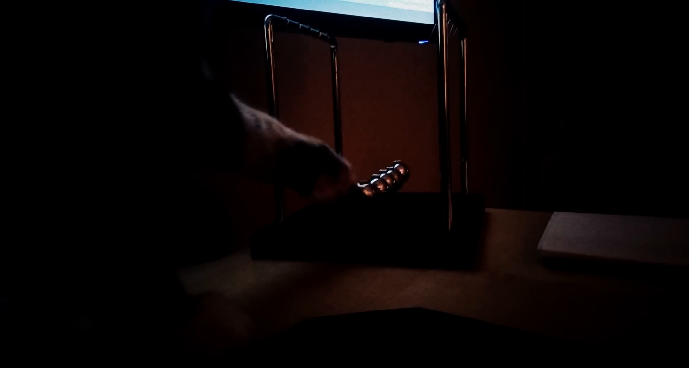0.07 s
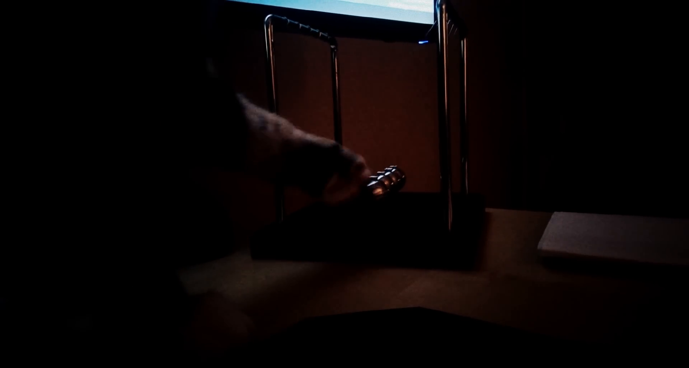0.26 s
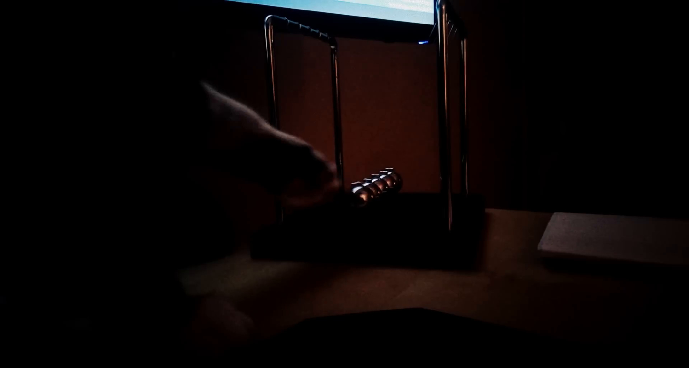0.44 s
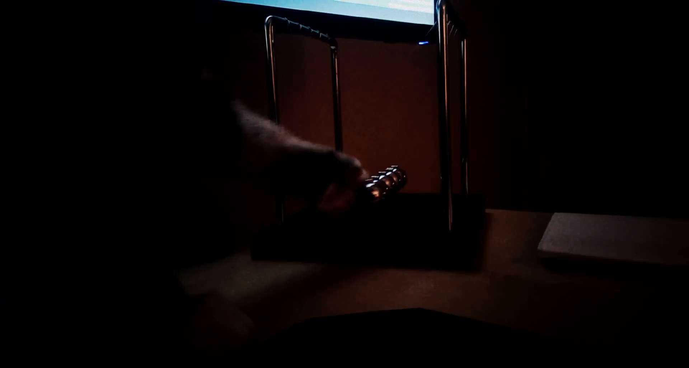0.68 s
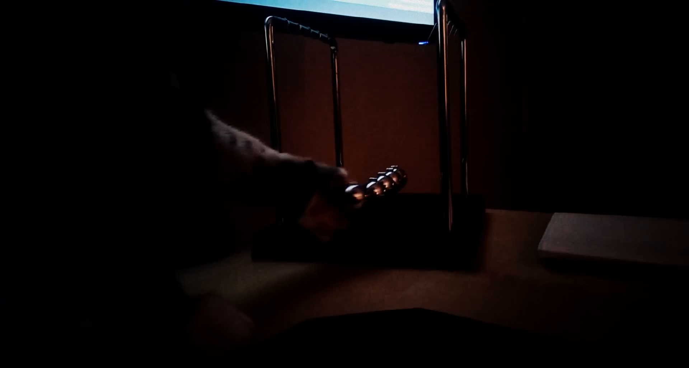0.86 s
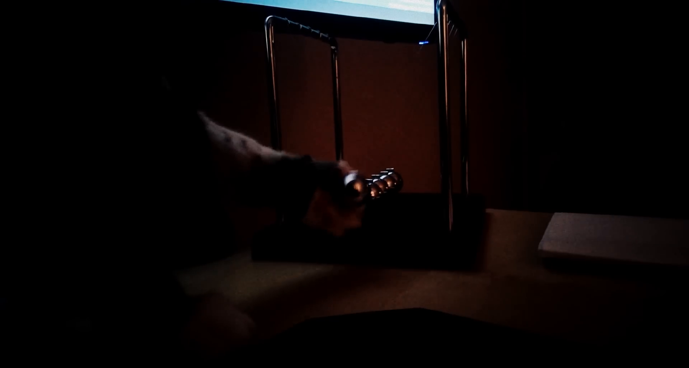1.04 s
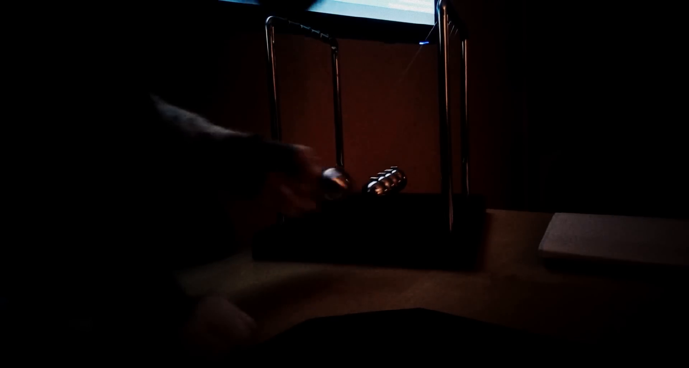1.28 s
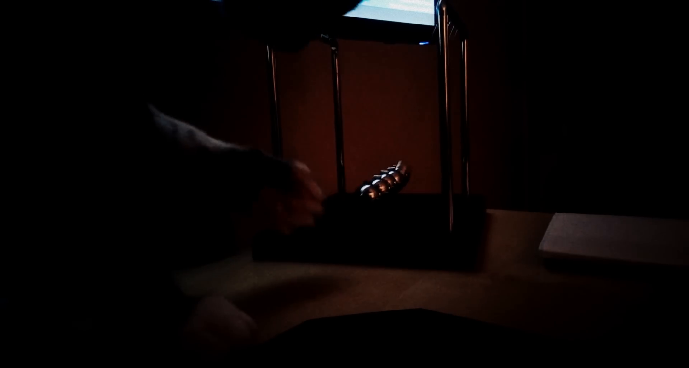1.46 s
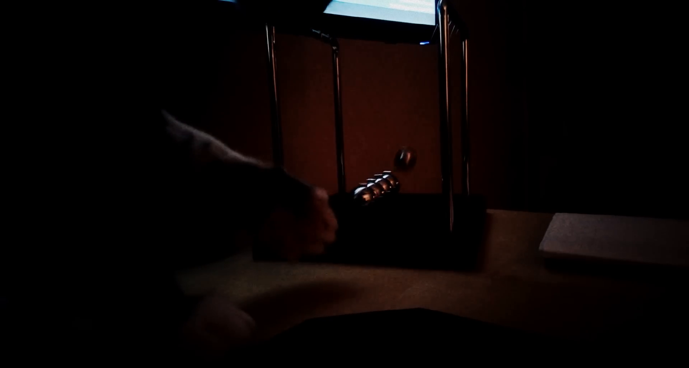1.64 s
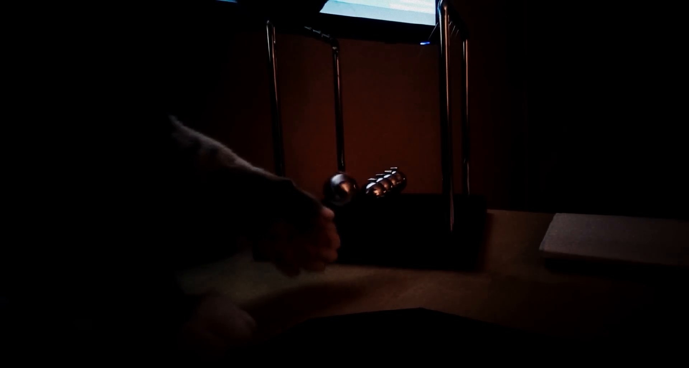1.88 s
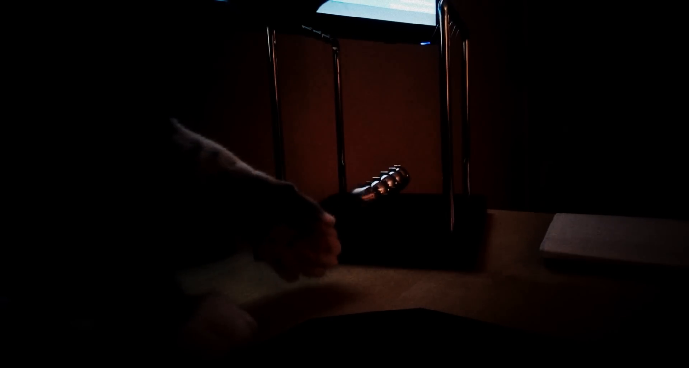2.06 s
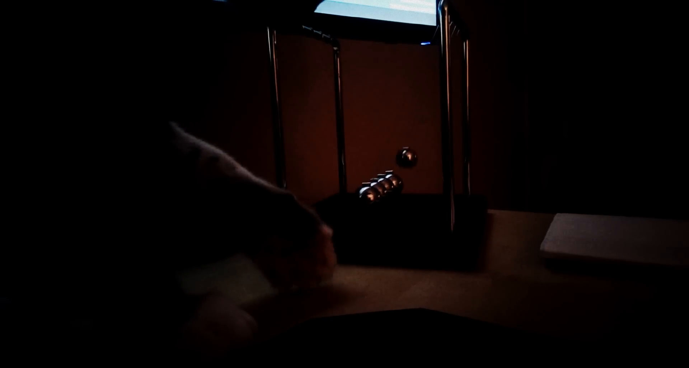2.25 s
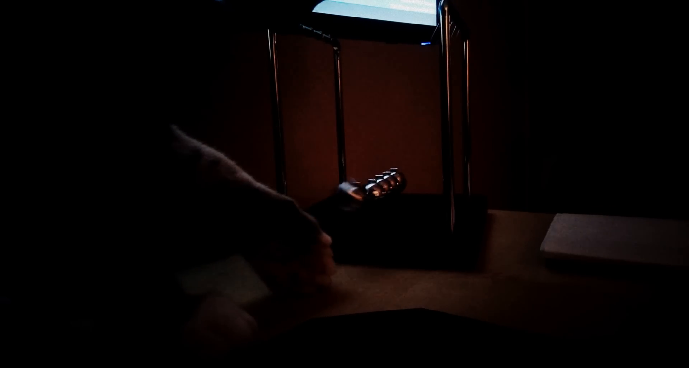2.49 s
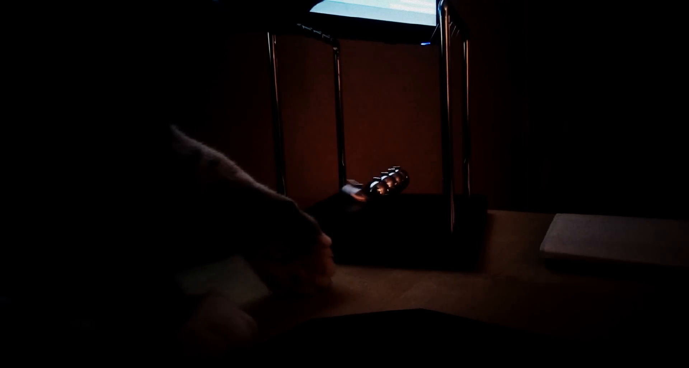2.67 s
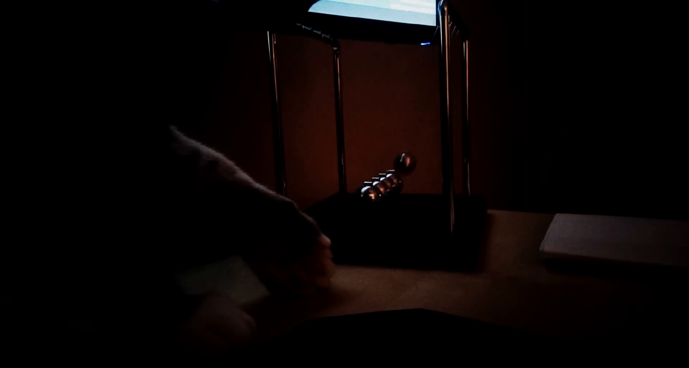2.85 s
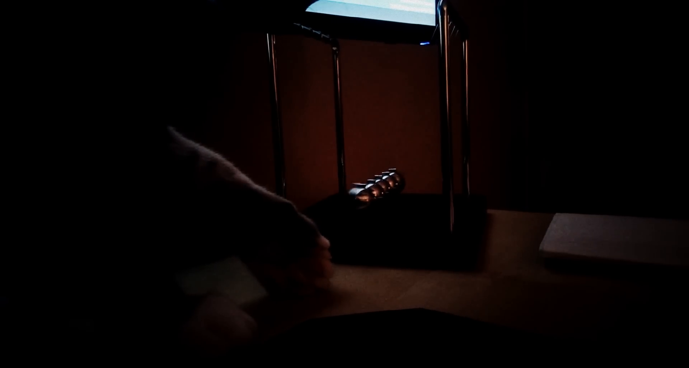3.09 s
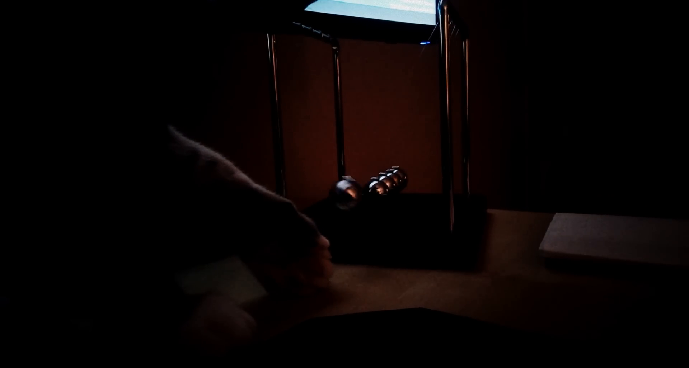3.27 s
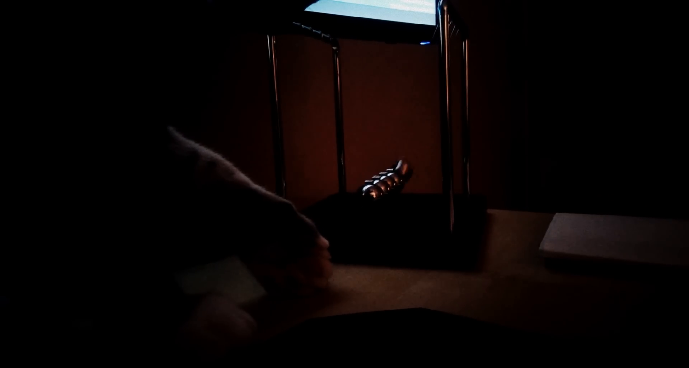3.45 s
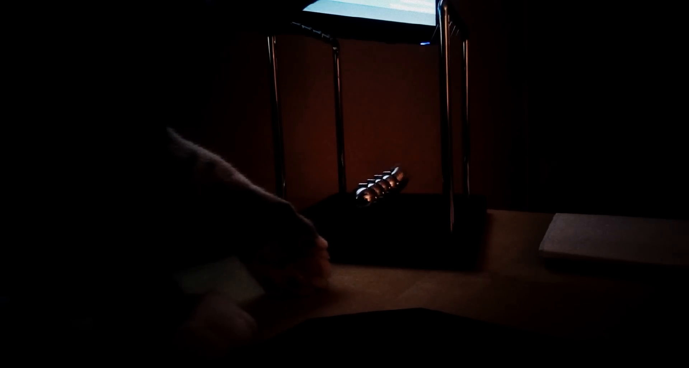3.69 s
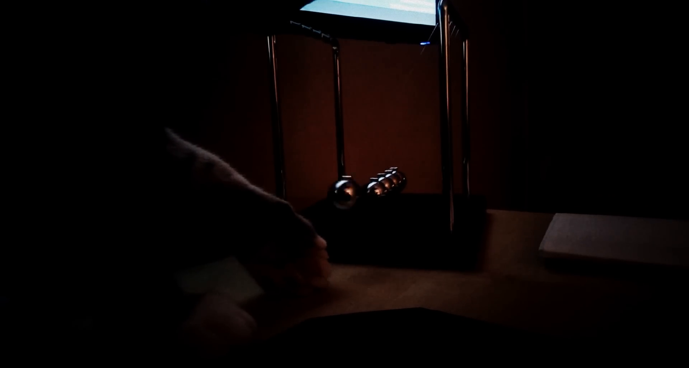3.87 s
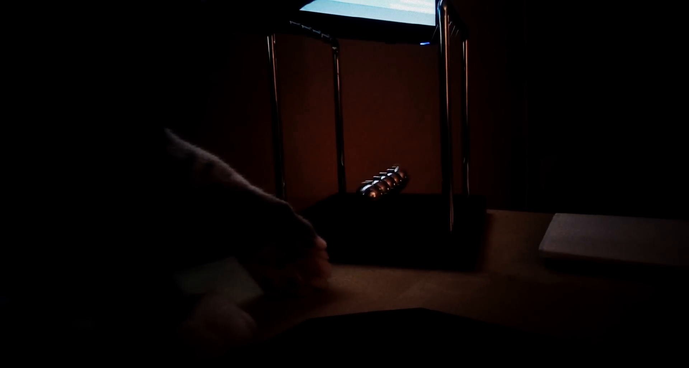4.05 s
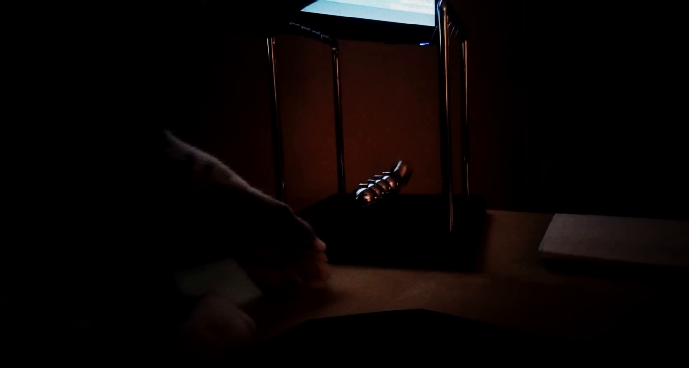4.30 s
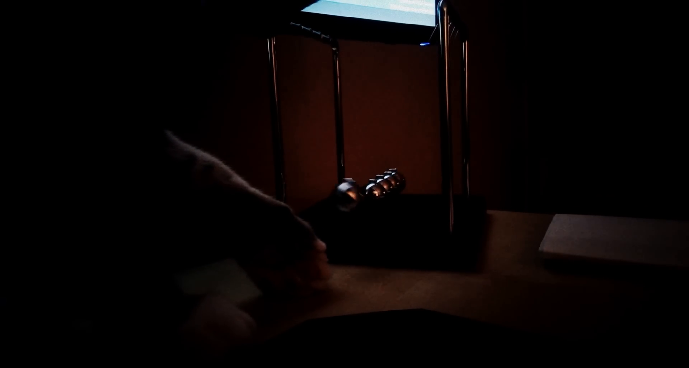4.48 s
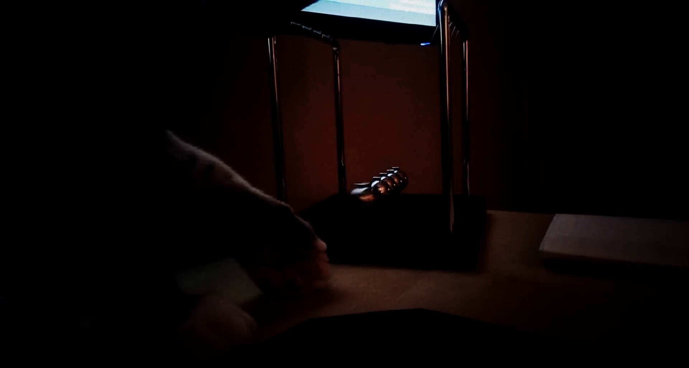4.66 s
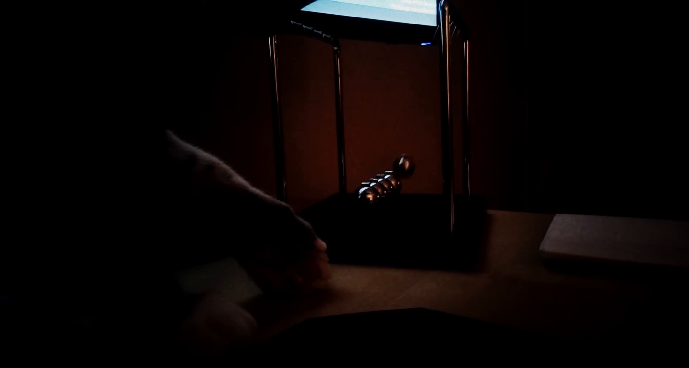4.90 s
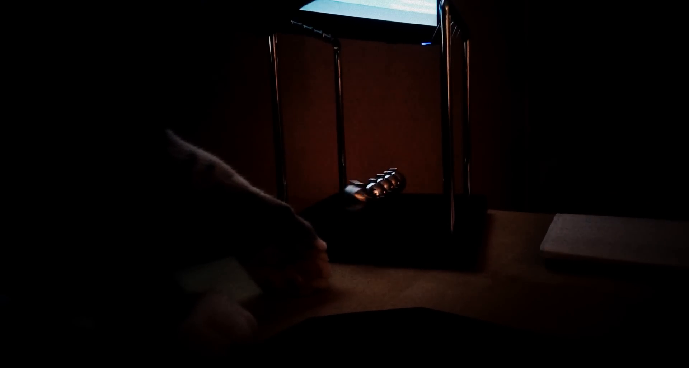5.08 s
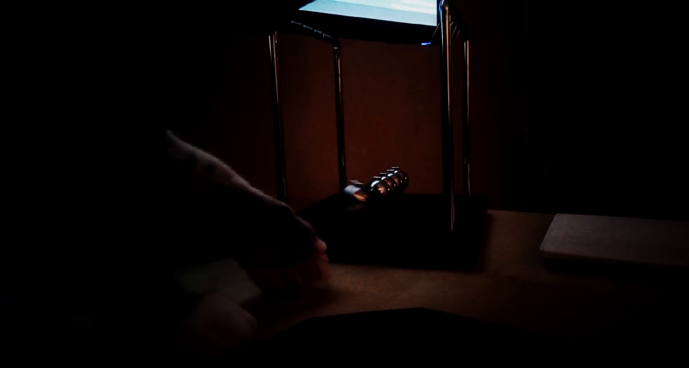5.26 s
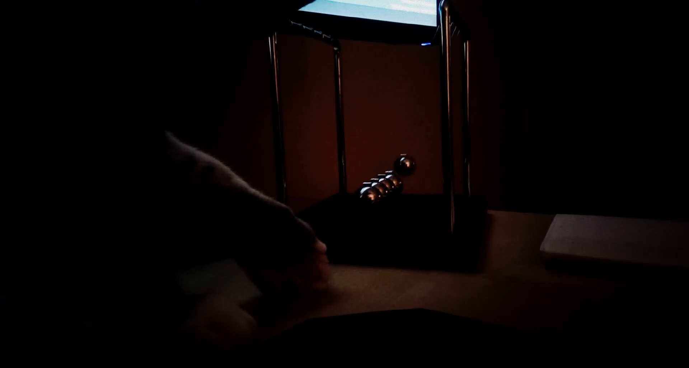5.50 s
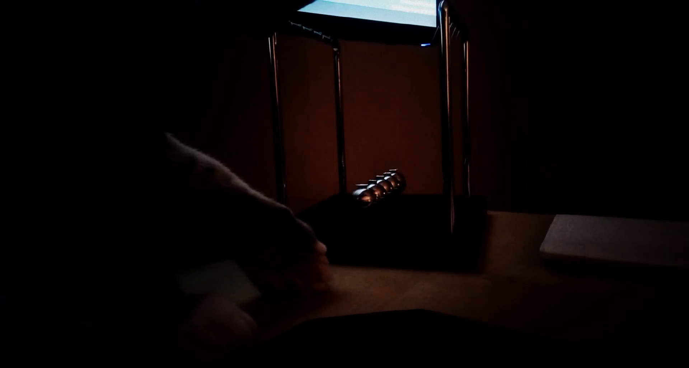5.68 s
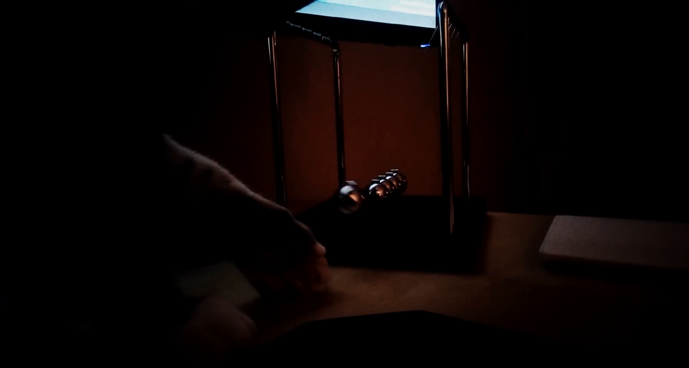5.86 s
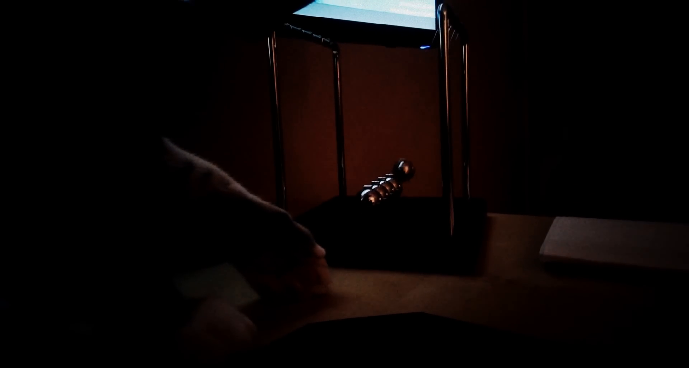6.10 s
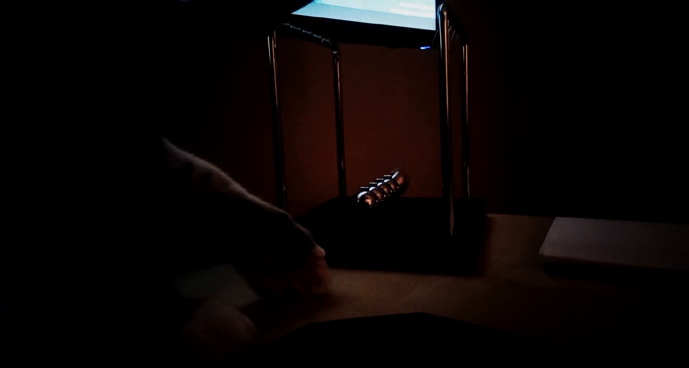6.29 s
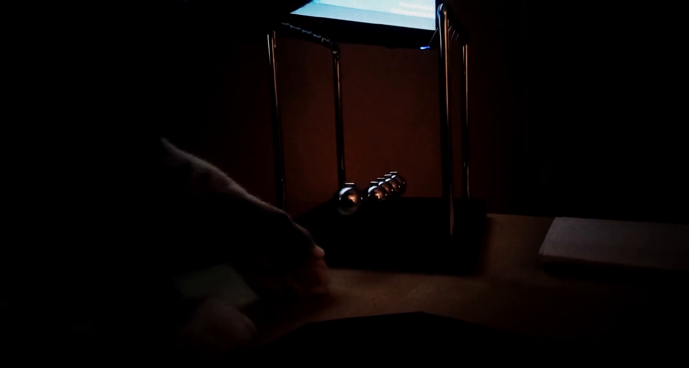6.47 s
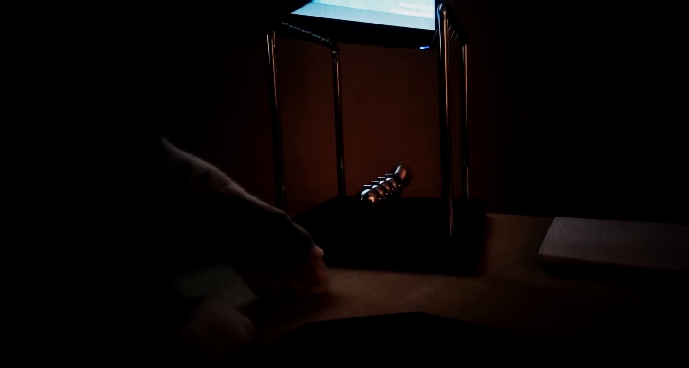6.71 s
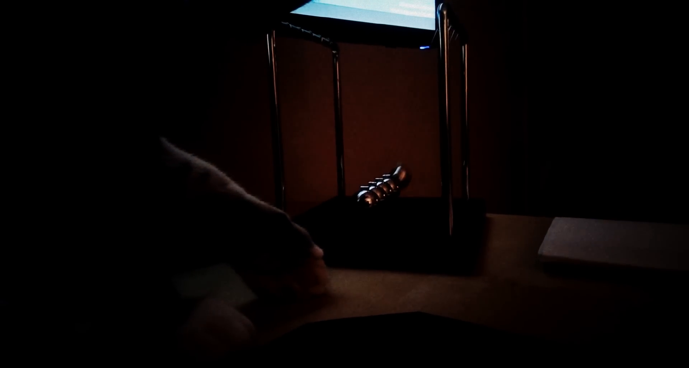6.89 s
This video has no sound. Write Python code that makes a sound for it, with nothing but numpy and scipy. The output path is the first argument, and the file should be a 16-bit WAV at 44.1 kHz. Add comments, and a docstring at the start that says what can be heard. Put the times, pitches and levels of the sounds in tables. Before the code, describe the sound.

A desktop pendulum toy with steel balls is heard close up in a quiet room, over soft room tone and a faint fan hum. For the first 1.5 seconds the balls tick lightly and unevenly as one is drawn back. Two faint, thin squeaks fall in pitch within the first 0.3 seconds, followed by a brief rub and a couple of soft bumps. From about 1.6 seconds the balls clack loudly and evenly, three times a second, each bright clack a quick chatter of contacts with a short room echo and a faint desk thud. A very soft brush on the desk comes near 1.9 seconds. Small jostling ticks fall between the clacks, weakening until they vanish around 6 seconds. The clacks grow tighter and slightly softer, continuing to the end at about 7 seconds.

```python
"""A Newton's cradle on a desk in a quiet room, close to a pair of microphone ports.
The steel balls tick lightly as a paw draws one back; once let go it clacks three times a second, each
clack a quick chatter of separate contacts, with small jostles in between. The frame rocks and the desk
thuds faintly. The paw brushes past, two thin squeaks fall near the start, and a fan hums behind it all."""
import sys
import numpy as np
from scipy import signal
from scipy.fft import rfft, irfft
from scipy.io import wavfile
from scipy.ndimage import uniform_filter1d

SR = 44100
rng = np.random.default_rng(int(sys.argv[2]) if len(sys.argv) > 2 else 0)


def transcribe(signal):
    """Save signal, clipped to [-1, 1], as a 16-bit WAV file at the path in sys.argv[1]."""
    frames = np.atleast_2d(signal).T
    limited = np.clip(frames, -1, 1)
    pcm = np.round(limited * 32767).astype(np.int16)
    wavfile.write(sys.argv[1], SR, pcm)


N = 305613

# One clack a swing. Each row: start in seconds, first blow's strength in dB, its chatter in seconds,
# second blow's delay in seconds, its strength in dB, its chatter in seconds, share of the chatter at
# which a middle contact falls (0 for none), desk thud in dB, desk knock in dB.
SWINGS = [(1.56172, 2, 0, .01066, -.5, .00685, .64, -64, -76),
          (1.88844, 2.5, 0, .01208, .7, .004, .73, -55, -57),
          (2.21494, 3.5, 0, .01456, 1.2, .00177, .86, -56, -72),
          (2.54147, 1.5, 0, .01465, -1.8, .00091, .37, -52.5, -55),
          (2.86932, .5, 0, .01261, -4, .00251, .08, -55, -76),
          (3.1959, 1, 0, .01104, .6, .00091, .4, -55, -56),
          (3.52349, 1.5, 0, .00882, -.3, .0008, .57, -68, -76),
          (3.84995, -1.5, 0, .00667, -1.7, .00034, 0, -60, -51),
          (4.17794, -2.5, 0, .00297, -2.7, .00115, .37, -63, -72),
          (4.50463, -2.5, 0, .00034, -.7, 0, 0, -59, -74),
          (4.8288, -1.7, .00097, .00349, -2, 0, .7, -60, -57),
          (5.15277, 3, 0, .00492, -2.5, 0, 0, -52, -64),
          (5.4768, -.7, .00014, .00715, 1.5, 0, 0, -53.5, -69),
          (5.79955, -3.2, .00174, .00734, -2.5, 0, .31, -60, -58),
          (6.12401, -2.2, .00071, .00701, -2.5, 0, 0, -72, -74),
          (6.4481, 1, 0, .00401, -5.5, 0, 0, -65, -53),
          (6.77204, -2.7, 0, .00077, -2.7, .00125, .51, -68, -70)]


def gain_of(db):
    """Decibels to amplitude."""
    return 10 ** (np.asarray(db) / 20)


def unit_rms(x):
    """Scales to rms 1."""
    return x / np.sqrt(np.mean(x ** 2) + 1e-20)


def curves_at(table, hz):
    """A table's columns at the frequencies hz, interpolated on a log axis."""
    table_hz, *columns = np.transpose(table)
    return np.array([np.interp(np.log(hz + 1), np.log(table_hz + 1), column) for column in columns])


def add(mix, start_s, sound):
    """Mixes a sound in at start_s."""
    part = mix[max(round(start_s * SR), 0):][:len(sound)]
    part += sound[:len(part)]


def causal_pulse(db):
    """The shortest causal pulse that has the spectrum db."""
    log_gain = np.concatenate([db, db[-2:0:-1]]) * np.log(10) / 20
    return np.fft.ifft(np.exp(np.conj(signal.hilbert(log_gain)))).real


def ring(x, responses):
    """Passes one signal through a response for each channel."""
    return signal.oaconvolve(x[None], np.atleast_2d(responses), axes=1)[:, :N]


def drift(top_hz):
    """A random wander of rms 1, made of sines below top_hz."""
    t = np.arange(0, N, 256) / SR
    rates_hz = top_hz * rng.uniform(0.101, 1, size=16)
    wander = sum(np.sin(2 * np.pi * (hz * t + rng.random())) for hz in rates_hz)
    return unit_rms(np.interp(np.arange(N) / SR, t, wander))


def room_air(level_db=-61.4, lean_db=1.25):
    """Steady room tone, nearly mono in the bass, leaning a little left."""
    # Each row: frequency in Hz, relative noise density in dB.
    spectrum = [(20, -11), (36, -10.5), (60, -3), (85, -9.5), (135, -2.5), (175, -7.5), (235, -3),
                (373, -9.5), (490, -6), (775, -13), (1100, -15.5), (2400, -18), (3100, -21), (14800, -31.5)]
    # Each row: frequency in Hz, correlation between left and right.
    likeness = [(50, 0.81), (250, 0.81), (600, 0.67), (1500, 0.083), (12000, .1)]
    hz = np.fft.rfftfreq(N, 1 / SR)
    left, other = rfft(rng.standard_normal((2, N)))
    same = curves_at(likeness, hz)[0]
    right = same * left + np.sqrt(1 - same ** 2) * other
    noise = irfft(np.array([left, right]) * gain_of(curves_at(spectrum, hz)), N)
    return gain_of(level_db) * unit_rms(noise) * gain_of([[lean_db], [-lean_db]])


def fan_hum(waver_db=3.25, wander_rad=0.85):
    """Fan and mains hum in the background: tones that waver in level and phase."""
    # Each row: frequency in Hz, rms level in dB about which the tone wavers.
    tones = [(59, -79.5), (130, -79), (217.5, -70.5), (269, -81), (317, -74), (736, -85), (788, -82),
             (842, -82.5)]
    t, out = np.arange(N) / SR, np.zeros(N)
    for hz, db in tones:
        amplitude = np.sqrt(2) * gain_of(db + waver_db * drift(5))
        out += amplitude * np.sin(2 * np.pi * hz * t + wander_rad * drift(7))
    return out


def room_tail(onset_s=0.0068, early_db=4.5, early_s=.06, uneven_db=1.5):
    """The room's answer to one contact: dense reflections, strongest at first, the treble dying soonest."""
    # Each row: frequency in Hz, left and right level in dB, seconds to fall 60 dB.
    reverb_bands = [(500, -37.5, -40.5, .5), (1150, -26.5, -28, 0.56), (1960, -22.5, -23, 0.66),
                    (3470, -7, -17.5, 0.66), (5600, -6.5, -10.5, .52), (7760, -13.5, -10.5, 0.44),
                    (10800, -18, -22, 0.4), (14200, -26.5, -9.5, 0.34), (17000, -26.5, -34, 0.24)]
    reflections = rng.standard_normal((2, SR)) * (rng.random((2, SR)) < .2)
    hz, t, spectra = signal.stft(unit_rms(reflections), SR, nperseg=256)
    left_db, right_db, t60 = curves_at(reverb_bands, hz)[:, :, None]
    unit_energy = np.sqrt(2 * np.log(1000) / (t60 * SR))
    spectra = spectra * unit_energy * gain_of(np.array([left_db, right_db]) - 60 * t / t60)
    # each pair of balls radiates some bands into the room more than others
    ripple = unit_rms(uniform_filter1d(rng.standard_normal(len(hz)), 4))
    spectra *= unit_rms(gain_of(uneven_db * ripple))[:, None]
    tail = signal.istft(spectra, SR, nperseg=256)[1]
    t = np.arange(tail.shape[1]) / SR
    onset = 1 - np.exp(-(t / onset_s) ** 3)
    return tail * onset * gain_of(early_db * np.exp(-t / early_s))


def room_reverb(pulses, wet_db=-2.5, places=5):
    """Different balls meet at different places, so the pattern of reflections keeps changing."""
    starts = [round(start_s * SR) for start_s, *_ in collisions()]
    place = np.searchsorted(starts, np.arange(N), side="right") % places
    wet = sum(ring(pulses * (place == k), room_tail()) for k in range(places))
    # the room still rings from a knock of the balls 31 ms before the start
    for channel, tail in zip(wet, room_tail()):
        add(channel, 0, gain_of(-1.5) * tail[round(0.031 * SR):])
    return gain_of(wet_db) * wet


def light_ticks():
    """Ball touches ball, once or with a bounce, mostly while the paw draws one back."""
    # Each row: start in seconds, strength in dB, treble lost in dB, bounce delay in seconds (0 for none).
    touches = [(.1025, -22.5, 11, 0), (.2835, -10, 6, 0), (.304, -15, 2, 0), (.321, -14, 3, 0),
               (.3962, -26, 12, 0), (.4428, -20.5, 4, 0), (.4952, -27.5, 12, 0), (.5016, -13, 4, 0),
               (.5287, -18, 4, 0), (.5418, -19.5, 12, 0), (.6899, -27.5, 8, .003), (.7389, -23, 9, .0021),
               (.8066, -17, 4, .0011), (.8512, -21, 5, 0), (1.048, -24, 8, .001), (1.1171, -18, 6, .0008),
               (1.1597, -20.5, 7, 0), (1.3533, -20, 13, 0), (1.429, -11, 6, 0), (1.4702, -22, 3, 0),
               (1.6635, -25, 10, 0), (2.8213, -29, 10, 0), (6.24, -28.5, 12, 0)]
    for start_s, db, dull_db, bounce_s in touches:
        yield start_s, db, dull_db
        if bounce_s > 0:
            yield start_s + bounce_s, db, dull_db


def contact_pulses(dull_above_hz=8600, scatter_db=-12.5, scatter_s=0.0015, size=256):
    """One sharp pulse a contact, duller when the touch is slow, scattered briefly by the other balls."""
    hz, t, out = np.fft.rfftfreq(size, 1 / SR), np.arange(size) / SR, np.zeros(N)
    treble = 1 / (1 + (dull_above_hz / (hz + 1)) ** 8)
    for start_s, db, dull_db in collisions():
        scatter = rng.standard_normal(size) * np.sqrt(t) * np.exp(-t / scatter_s)
        paths = (t == 0) + gain_of(scatter_db) * scatter / np.linalg.norm(scatter)
        add(out, start_s, gain_of(db) * np.convolve(causal_pulse(-dull_db * treble), paths))
    return out


def close_sound(pulses, ceiling=0.61, left_db=2.5, right_db=3.5):
    """The balls up close: hard pulses overload the microphone and peak alike; near surfaces echo them."""
    # Colour of a hard contact at the two ports. Each row: frequency in Hz, left and right gain in dB.
    click_colour = [(720, -27, -31), (1296, -11, -16), (1880, -16, -8), (2916, -4.8, -1.4),
                    (3610, 11.6, 2.5), (5360, -2, 9), (6590, 3.5, 8), (7130, -2.5, 10.5),
                    (9630, -15.5, 2.5), (9920, -4, 0), (13100, -3, 7), (13400, 1, 5.8), (15200, -12.5, 3),
                    (16000, -17, -12.5)]
    # Echoes off the base and frame. Each row: delay in seconds, left and right gain in dB.
    frame_echoes = [(.00045, -7, -35), (.00068, -13.5, -39), (.0011, -6.5, -23), (.00152, -10.5, -33.5)]
    hz = np.fft.rfftfreq(1024, 1 / SR)
    bass_cut_db = 6 * np.maximum(np.log2(700 / (hz + 20)), 0)
    colour = rfft([causal_pulse(db) for db in curves_at(click_colour, hz) - bass_cut_db])
    echoes = sum(gain_of([[left], [right]]) * np.exp(-2j * np.pi * hz * delay_s)
                 for delay_s, left, right in frame_echoes)
    response = irfft(colour * (1 + echoes))
    response[0] = np.roll(response[0], 2)  # the left port lies a little farther off
    overloaded = ceiling * np.tanh(pulses / ceiling)
    return gain_of([[left_db], [right_db]]) * ring(overloaded, response)


def wall_echoes(direct):
    """Flat walls and ceiling return each contact as distinct, quieter copies."""
    # Each row: delay in seconds, left and right gain in dB.
    echoes = [(0.014, -19, -40), (0.0259, -29, -25), (.0335, -37, -30), (0.0652, -28, -31)]
    out = np.zeros((2, N))
    for delay_s, *levels in echoes:
        for channel, sound, db in zip(out, direct, levels):
            add(channel, delay_s, gain_of(db) * sound)
    return out


def squeaks(waver=0.01):
    """Two faint, thin, unsteady falling notes."""
    # Each row: start and length in seconds, first and last pitch in Hz, peak level in dB.
    notes = [(0.137, .08, 2480, 2370, -64), (.19, 0.13, 2030, 1885, -71)]
    out = np.zeros(N)
    for start_s, length_s, first_hz, last_hz, db in notes:
        n = int(length_s * SR)
        hz = np.linspace(first_hz, last_hz, n) * (1 + waver * drift(70)[:n])
        add(out, start_s, gain_of(db) * np.hanning(n) * np.sin(2 * np.pi * np.cumsum(hz) / SR))
    return out


def desk_thuds(rise_s=0.01, rock_lag_s=.025):
    """Clacks and bumps rock the frame: a thud and a knock swell and die in the desk's two low modes."""
    # Thud first, then knock. Each row: frequency in Hz, seconds to fall 60 dB.
    modes = [(56, 0.74), (134, 0.39)]
    # The paw bumps the frame. Each row: start in seconds, thud in dB, knock in dB.
    paw_bumps = [(.275, -57, -56), (.46, -59, -75), (1.699, -55.5, -76)]
    rocks = [(start_s + rock_lag_s, thud_db, knock_db) for start_s, *_, thud_db, knock_db in SWINGS]
    t, out = np.arange(SR) / SR, np.zeros(N)
    for start_s, *levels in paw_bumps + rocks:
        for (hz, t60), db in zip(modes, levels):
            swell = (1 - np.exp(-t / rise_s)) * np.exp(-np.log(1000) * t / t60)
            add(out, start_s, gain_of(db) * swell * np.sin(2 * np.pi * hz * t))
    return out


def paw_brushes(roughness=0.46):
    """The paw rubs over the balls, later over the desk: short grainy hisses."""
    # Each row: start and length in seconds, level in dB, low and high band edge in Hz.
    strokes = [(.286, .052, -48, 2780, 8900), (1.88, .18, -65, 740, 920)]
    out = np.zeros((2, N))
    for start_s, length_s, db, low_hz, high_hz in strokes:
        n = int(length_s * SR)
        band = signal.butter(1, [low_hz, high_hz], "bandpass", fs=SR)
        for channel in out:
            grains = rng.standard_normal(n) * np.exp(roughness * rng.standard_normal(n))
            hiss = unit_rms(signal.lfilter(*band, grains))
            add(channel, start_s, gain_of(db) * hiss * signal.windows.tukey(n, .6))
    return out


def chatter(start_s, db, length_s, middle):
    """One hard blow: a single contact, or a quick run of two or three, all at full treble."""
    shares = sorted({0, middle, 1}) if length_s > 0 else [0]
    return [(start_s + share * length_s, db, 0) for share in shares]


def clacks():
    """An end ball strikes the row, then the slightly parted row closes with a second blow."""
    for start_s, first_db, first_chatter_s, lag_s, second_db, second_chatter_s, middle, *_ in SWINGS:
        yield from chatter(start_s, first_db, first_chatter_s, middle)
        yield from chatter(start_s + lag_s, second_db, second_chatter_s, middle)


def jostles(first_db=-18.7, fade_db_per_s=2.9, dull_db=5, weaker_db=1.2):
    """The middle balls sway at their own pace and nudge each other, more weakly as the sway dies."""
    # Each row: start, delay of the bounce and delay of the parting touch, all in seconds.
    nudges = [(1.7397, .0066, .046), (2.0463, .0178, .0553), (2.3682, .0035, .036), (2.6859, .0013, .0246),
              (2.9983, .0029, .0186), (3.3101, .0043, .0118), (3.6106, .0027, .0085),
              (3.9142, .0056, .0062), (4.7946, .0047, .0067), (5.0899, .0006, .0013),
              (5.3775, .0015, .0021), (5.674, .0028, .0058), (5.956, .0004, .001)]
    for start_s, *lags in nudges:
        db = first_db - fade_db_per_s * (start_s - nudges[0][0])
        yield start_s, db, dull_db
        for lag_s in lags:
            yield start_s + lag_s, db - weaker_db, dull_db


def collisions():
    """Every contact of ball on ball in order: start in seconds, strength in dB, treble lost in dB."""
    return sorted([*light_ticks(), *clacks(), *jostles()])


def scene():
    """The cradle close up, the room around it, air and hum behind."""
    pulses = contact_pulses()
    direct = close_sound(pulses)
    cradle = direct + wall_echoes(direct) + room_reverb(pulses)
    return cradle + paw_brushes() + desk_thuds() + squeaks() + room_air() + fan_hum()


def record(dry):
    """The recorder clips the highest peaks and cuts the treble above 16.6 kHz."""
    clipped = np.clip(dry, -.88, .88)
    lowpass = signal.firwin(151, 16600, window=("kaiser", 8), fs=SR)
    return signal.oaconvolve(clipped, lowpass[None], "same")


dry = scene()
out = record(dry)
transcribe(out)
```